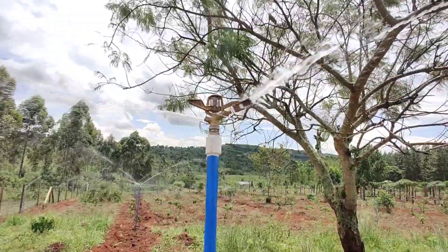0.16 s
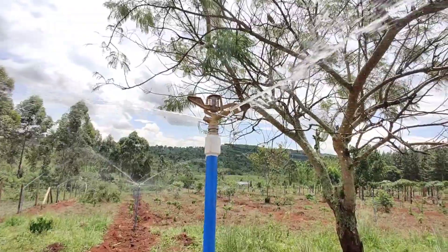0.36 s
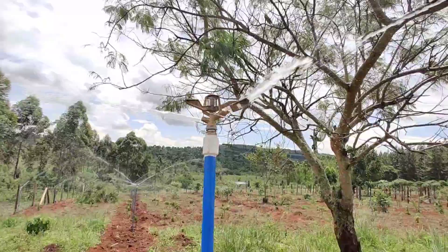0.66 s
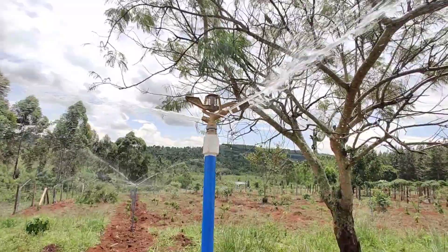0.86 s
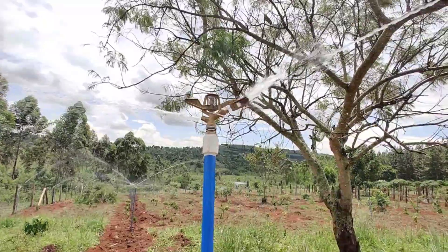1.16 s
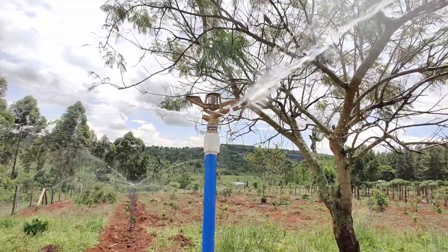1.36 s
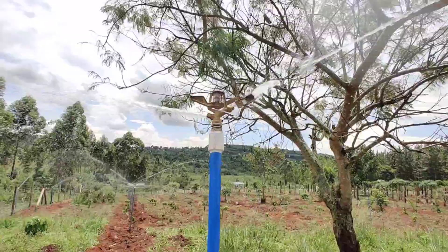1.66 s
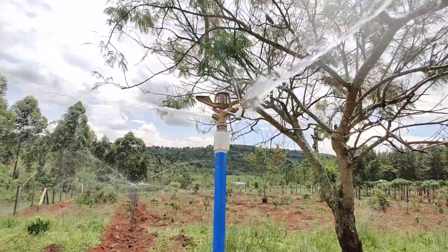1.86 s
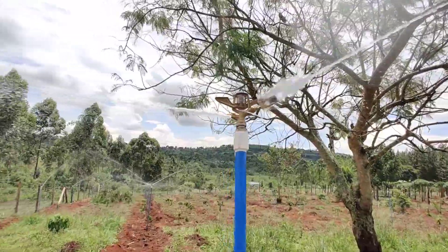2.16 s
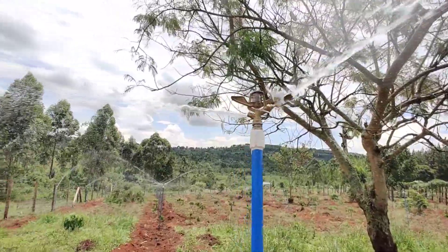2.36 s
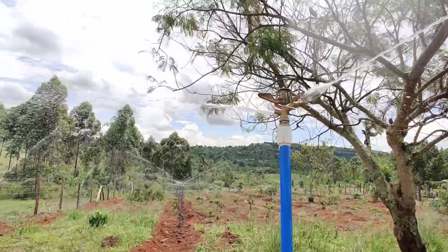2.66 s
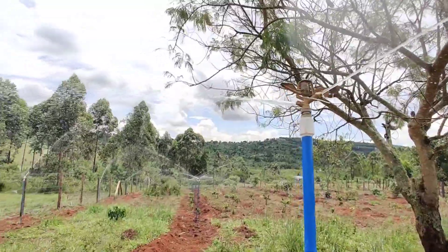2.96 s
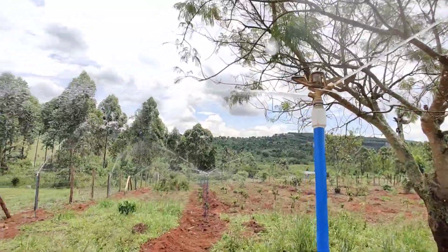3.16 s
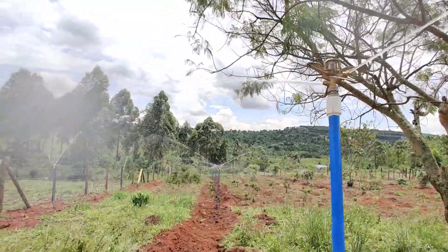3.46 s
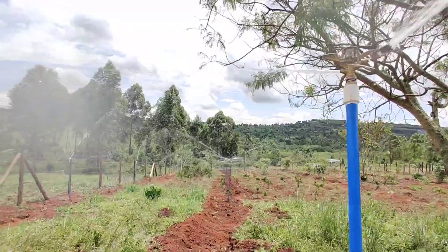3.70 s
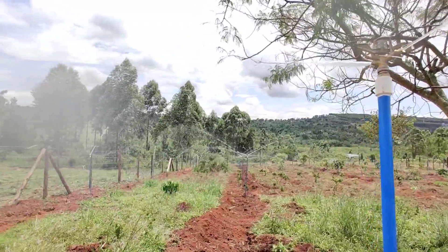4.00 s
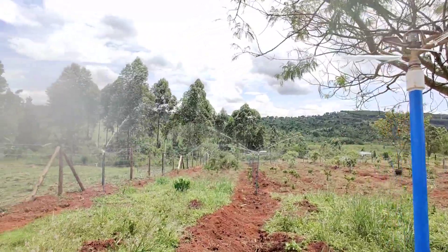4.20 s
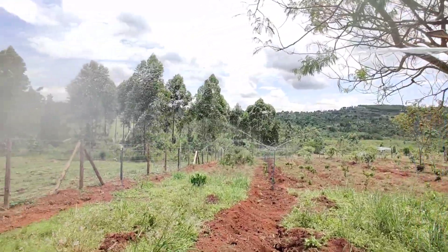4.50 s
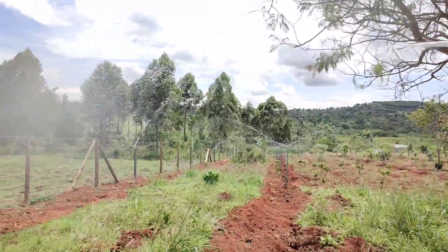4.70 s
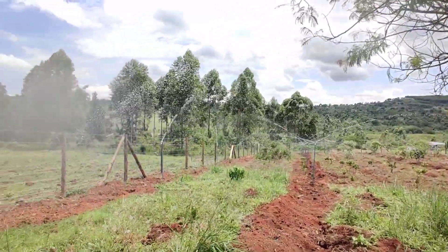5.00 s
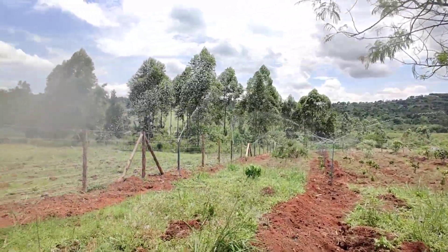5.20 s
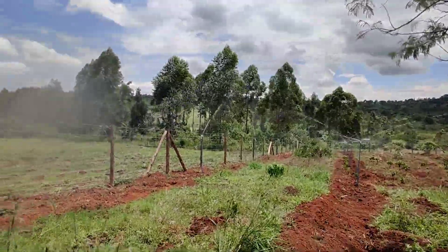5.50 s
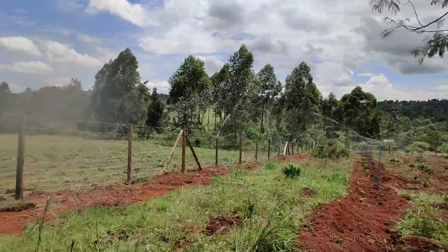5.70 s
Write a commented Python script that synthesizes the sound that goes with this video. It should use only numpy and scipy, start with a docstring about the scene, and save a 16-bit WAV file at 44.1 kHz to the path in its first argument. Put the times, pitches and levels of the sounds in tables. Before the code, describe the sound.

An impact sprinkler runs without pause for nearly six seconds in an open field, heard close in wide stereo. About six times a second the arm hits the jet: a quick double slap of coarse, crackling drops, a short fluttering sheet of spray, a dull little plop and a narrow high sizzle on the left, then a thinner bright swish before the next stroke. Fine nozzle hiss continues underneath with a faint rush of open air. From 0 to 0.7 s wind rumbles and pops on the microphone; weaker gusts come around 1 s, 1.4 to 2.5 s, 4.1 s and 4.9 s. Small drops click near the recorder, clearly at 0.26, 0.7, 1.8, 2.9 and 4.8 s. The swishes strengthen until about 4.7 s, as the sprinkler drifts rightward. Heavy drops knock wetly on the case at 5.05, 5.14, 5.2, 5.4 and 5.75 s.

```python
"""Impact sprinkler in an open field

Six times a second the sprinkler's arm slaps into the jet and sprays, then swings clear with a thinner swish.
The water is made of random drops and hiss, shaped in time and colour, over the steady hiss of the nozzle.
Stray drops tick and knock on the recorder as clicks and fading rings; wind is filtered noise in swells.
The left and right channels ring at different pitches.
"""
import sys
import numpy as np
from scipy import signal
from scipy.fft import rfft, irfft
from scipy.io import wavfile
from scipy.ndimage import uniform_filter1d, map_coordinates

SR = 44100
rng = np.random.default_rng(int(sys.argv[2]) if len(sys.argv) > 2 else 0)


def transcribe(signal):
    """Save signal, clipped to [-1, 1], as a 16-bit WAV file at the path in sys.argv[1]."""
    frames = np.atleast_2d(signal).T
    limited = np.clip(frames, -1, 1)
    pcm = np.round(limited * 32767).astype(np.int16)
    wavfile.write(sys.argv[1], SR, pcm)


N = 257984
TIME = np.arange(N) / SR

# the sprinkler drifts to the right:
# [t/s, lag of the left channel/ms, f of the right channel's dip/Hz, right-side treble level/dB]
BEARING = [(0, 0.21, 2090, -1), (2, 0.22, 2430, 1), (2.7, 0.247, 2760, 5), (3.5, 0.323, 2930, 6),
           (4.3, 0.339, 3880, 8), (5, 0.419, 4720, 5), (5.85, 0.441, 4580, 5)]


def from_db(db):
    """Turn decibels into a plain factor."""
    return 10 ** (np.asarray(db) / 20)


def rms_one(x):
    """Bring a sound to an average (RMS) strength of 1."""
    return x / np.sqrt(np.mean(x ** 2) + 1e-20)


def bell(x, centre, width):
    """A rounded peak of height 1."""
    return np.exp(-0.5 * np.minimum(((x - centre) / width) ** 2, 100))


def along(t, rows, axis=1):
    """One column of a table, joined by straight lines in time."""
    rows = np.array(rows)
    return np.interp(t, rows[:, 0], rows[:, axis])


def at_hz(points, hz):
    """A spectrum joined by straight lines in log frequency."""
    points = np.array(points)
    return np.interp(np.log(hz + 1), np.log(points[:, 0]), points[:, 1])


def drift(rate_hz, size):
    """A smoothly wandering random curve of spread 1."""
    knots = rng.standard_normal(size // 8 + 2)
    place = np.arange(size) * min(rate_hz / SR, 1 / 8)
    # straight lines between knots lose a third of the power; the root restores it
    return np.interp(place, np.arange(len(knots)), knots) * np.sqrt(3 / 2)


def colour(x, response, size=4096):
    """Filter that never acts ahead of the sound (minimum phase); response gives dB for Hz."""
    hz = np.arange(size // 2 + 1) * SR / size
    cepstrum = irfft(np.log(from_db(response(hz))))
    # folding the second half onto the first puts the filter's energy as early as possible
    cepstrum[1:size // 2] *= 2
    cepstrum[size // 2 + 1:] = 0
    impulse = irfft(np.exp(rfft(cepstrum)))
    return signal.oaconvolve(x, impulse)[:len(x)]


def tinted(pair, points):
    """Both channels through one spectrum."""
    return np.array([colour(x, lambda hz: at_hz(points, hz)) for x in pair])


def add(out, sound, s):
    """Mix a sound in at time s."""
    start = max(round(s * SR), 0)
    out[:, start:start + sound.shape[1]] += sound[:, :N - start]


def channel_rings(pair, left_db, right_db, right_hz):
    """Each channel has its own colour and one broad ring; the right one has a narrow dip near 8.7 kHz."""
    # channel colours without their rings: [f/Hz, level/dB]
    left_colour = [(150, -21), (900, -14.5), (1600, -4.5), (2400, -12.5), (3300, -9), (4200, -4.5),
                   (5200, -18.5), (6300, 1.3), (7300, 1), (10500, 4.5), (11500, 1), (13000, -1),
                   (15500, -4.5)]
    right_colour = [(150, -5.5), (900, -11.5), (1600, -2.5), (2400, -5.5), (3300, 2), (4200, 7),
                    (6500, -0.24), (7400, -11.5), (8500, 1), (10000, -14), (13000, -10.5), (15400, -5)]
    left_hz, left_width_hz, right_width_hz = 8740, 747, 526
    notch_hz, notch_db, notch_width_hz = 8740, -18.5, 420

    def left_response(hz):
        return at_hz(left_colour, hz) + left_db * bell(hz, left_hz, left_width_hz)

    def right_response(hz):
        ring = right_db * bell(hz, right_hz, right_width_hz)
        notch = notch_db * bell(hz, notch_hz, notch_width_hz)
        return at_hz(right_colour, hz) + ring + notch

    return np.array([colour(pair[0], left_response), colour(pair[1], right_response)])


def facing(pair, s):
    """Sound bends round the case to the right port: a dip and the treble shift as the sprinkler moves aside."""
    dip_hz, treble_db = along(s, BEARING, axis=2), along(s, BEARING, axis=3)

    def right_response(hz):
        dip = -10.0 * bell(hz, dip_hz, 0.098 * dip_hz)
        return dip + treble_db * bell(hz, 11500, 1800)

    return np.array([pair[0], colour(pair[1], right_response, size=1024)])


def rippled(pair, ripple_db=2.0, step_hz=330):
    """Every sheet of water breaks up with a random colour of its own."""
    grid = np.arange(0, SR, step_hz)
    ripples = ripple_db * rng.standard_normal((2, len(grid)))
    return np.array([colour(x, lambda hz: np.interp(hz, grid, r), size=1024) for x, r in zip(pair, ripples)])


def spray(per_s, spread_db, grainy, alike):
    """Water tearing into droplets: tiny clicks of uneven size over smooth hiss, partly common to both channels."""
    size_db = spread_db * np.minimum(rng.exponential(1, (3, N)), 4)
    sizes = from_db(size_db) * rng.choice([-1, 1], (3, N))
    drops = rms_one(sizes * (rng.random((3, N)) < per_s / SR))
    # grainy and alike are shares of the power
    water = np.sqrt(grainy) * drops + np.sqrt(1 - grainy) * rng.standard_normal((3, N))
    # the common part reaches the left channel later
    late = map_coordinates(water[0], [np.arange(N) - along(TIME, BEARING) * SR / 1000], order=3)
    common = np.array([late, water[0]])
    return np.sqrt(alike) * common + np.sqrt(1 - alike) * water[1:]


def arm_strokes(count=35):
    """The arm swings on its spring, each swing a little longer; rows hold time and the columns of aspect."""
    # the splash as the head turns and moves past the recorder: [t/s, relative splash level/dB,
    # left ring level/dB, right ring level/dB, right ring f/Hz]
    aspect = [(.08, -26, 13, 12, 5600), (.75, -24.5, 15.5, 11, 5650), (1.4, -24.5, 16, 11.8, 5610),
              (1.76, -25, 16.5, 15, 5920), (2.15, -27, 18.5, 10, 5570), (2.48, -28.5, 18.5, 13, 4870),
              (2.95, -28, 16, 17.5, 5010), (4.0, -27.5, 14, 19, 5340), (4.6, -28, 13.5, 19, 5340),
              (4.9, -28, 14, 12.5, 5460), (5.55, -27.5, 11, 19, 4650)]
    first_s, swing_s, growth_s = 0.0825, 0.16778, 0.000017
    k = np.arange(count)
    s = first_s + swing_s * k + growth_s * k * (k - 1) / 2
    trend = np.transpose([along(s, aspect, axis) for axis in range(1, 5)])
    # chance from stroke to stroke: dB, dB, dB, Hz
    chance = rng.standard_normal(trend.shape) * [0.5, 0.1, 0.1, 30]
    return np.column_stack([s, trend + chance])


def field(level_db=-56.5):
    """Soft rush of the open country: steady coloured noise."""
    # distant air: [f/Hz, relative level/dB]
    distant_air = [(30, -1), (120, -6), (250, 1), (400, -4.5), (700, -3.5), (1200, -25), (3000, -5),
                   (12000, -37)]
    return from_db(level_db) * rms_one(tinted(rng.standard_normal((2, N)), distant_air))


def wind(strokes, waver_db=3.5, waver_per_s=24, even_size=2600):
    """Turbulence hits each port separately; stronger wind brings out a higher, lumpier flap."""
    # the breeze on the ports dies down unevenly: [t/s, relative level/dB]
    breeze_levels = [(0, -25), (.45, -20), (.78, -35.5), (1.55, -35.5), (2.1, -28), (2.55, -32.5),
                     (3.05, -38), (3.45, -51.5), (4.499, -49.5), (4.8, -37), (5.1, -59), (5.85, -52)]
    # gusts on top of it: [t/s, width/s, relative level/dB]
    gust_list = [(0.013, 0.028, -14.5), (0.192, 0.019, -16), (.29, 0.032, -19), (.41, .04, -18.5),
                 (.61, 0.021, -20.5), (0.932, 0.069, -27.5), (1.03, 0.043, -29.5), (1.44, 0.026, -25.5),
                 (1.697, 0.031, -21), (1.88, .018, -23.5), (2.14, 0.025, -24), (2.29, 0.028, -27.5),
                 (2.42, 0.032, -25), (3.997, 0.011, -31), (4.081, 0.014, -29), (4.189, 0.011, -31.5),
                 (4.62, 0.0052, -38), (4.89, 0.015, -32), (4.985, 0.0082, -36)]
    # colours of the rumble, the buffeting and the flap of hard gusts: [f/Hz, relative level/dB]
    rumble = [(2, -28.5), (12, -6.5), (25, 0.5), (60, -2), (85, -4), (110, -11), (150, -28), (400, -67),
              (2000, -93)]
    buffet = [(50, -19.5), (100, -1.5), (130, 1), (200, -7), (300, -19), (450, -35), (1000, -60.5),
              (6000, -104)]
    flap = [(100, -15), (220, 2), (320, -2), (450, -9), (700, -21.5), (1500, -39.5), (6000, -57)]

    breeze = from_db(along(TIME, breeze_levels) + waver_db * drift(waver_per_s, N))
    gusts = [from_db(gust_db) * bell(TIME, s, width_s) for s, width_s, gust_db in gust_list]
    # every stroke pushes a puff of air at the ports
    puff_delay_s, puff_width_s, puff_db = 0.022, 0.015, -45
    puffs = [from_db(puff_db) * bell(TIME, s + puff_delay_s, puff_width_s) for s, *_ in strokes]
    wind_db = 10 * np.log10(breeze ** 2 + sum(gust ** 2 for gust in gusts + puffs))

    # level in a wind of 0 dB, plus dB for each dB of wind
    rumble_db = -8 + 0.5 * wind_db
    flap_db = -2.5 + 1.563 * wind_db
    out = 0
    # the last number is the unevenness of the lumps in dB
    for spectrum, level_db, lumps_db in ((rumble, rumble_db, 2.0), (buffet, wind_db, 3.5), (flap, flap_db, 4.5)):
        lumps = from_db(lumps_db * np.array([drift(70, N), drift(70, N)]))
        air = tinted(rng.standard_normal((2, N)) * lumps, spectrum)
        # evened out, so that breeze, gusts and puffs alone set the slow swell
        power = uniform_filter1d(np.mean(air ** 2, axis=0), even_size)
        out = out + from_db(level_db) * air / np.sqrt(power + 1e-12)
    return out


def eddies(level_db=-0.5, lean_db=4.5):
    """An eddy crossing the ports is a rounded pressure pulse with a trough each side, stronger at one port."""
    # single hard eddies that pop: [t/s, relative level/dB, width/s]
    pops = [(.031, -17.5, 0.00028), (.198, -12.5, 0.00098), (.284, -14.5, 0.0004), (.31, -13, 0.00057),
            (.352, -11.5, 0.00082), (0.411, -18, 0.00072), (.421, -12.5, 0.00056), (.449, -14, 0.00065),
            (1.68, -12.5, 0.00186), (1.691, -16, 0.0016), (2.429, -18, 0.0008), (4.07, -17, 0.0016),
            (4.085, -18, 0.0016)]
    out, t = np.zeros((2, N)), np.arange(-500, 500) / SR
    for s, peak_db, width_s in pops:
        u = (t / width_s) ** 2
        lean = lean_db * np.tanh(rng.standard_normal()) * np.array([[1], [-1]])
        pulse = (1 - u / 2) * np.exp(-u / 2)
        add(out, from_db(level_db + peak_db + lean) * pulse, s + t[0])
    return out


def knocks(fade_s=0.0073, splat_db=-11.5, rise_s=0.00079, lag_s=0.00042, size=8192):
    """A heavy drop rings the case and splatters over it; the ring reaches the left channel a little later."""
    # heavy drops on the case: [t/s, relative ring level/dB, relative splat level/dB]
    heavy_drops = [(5.053, -29.5, -14.5), (5.137, -33, -20), (5.195, -25.5, -7.5), (5.415, -23.5, -11),
                   (5.752, -26.5, -23)]
    # ringing tones of the case: [f/Hz, relative level/dB, time to fade by 60 dB/s]
    case_tones = [(239, -11.5, .1), (330, -9, 0.045), (517, -10, 0.046), (688, -5.5, 0.05), (737, 1, 0.076),
                  (787, -3.5, 0.025), (1320, -8, 0.042), (1820, -13, 0.022), (2780, -21, 0.034)]
    # colour of the splat: [f/Hz, relative level/dB]
    splat_colour = [(150, -12), (600, -2), (1100, -8), (1800, 4), (2900, -2), (4200, -8), (9000, -29),
                    (15000, -32)]
    rings, splats, t = np.zeros((2, N)), np.zeros((2, N)), np.arange(size) / SR
    age = np.maximum(t - np.array([[lag_s], [0]]), 0)
    ring = np.zeros((2, size))
    for hz, db, t60 in case_tones:
        phase = rng.uniform(0, 2 * np.pi)
        ring += from_db(db - 60 * age / t60) * np.sin(2 * np.pi * hz * age + phase)
    ring *= 1 - np.exp(-age / rise_s)
    for s, ring_db, wet_db in heavy_drops:
        add(rings, from_db(ring_db) * ring, s)
        splat = rng.standard_normal((2, size)) * np.exp(-t / fade_s)
        add(splats, from_db(wet_db + splat_db) * splat, s)
    # the splat is louder on the right
    return rings + tinted(splats, splat_colour) * from_db([[-3.0], [4.0]])


def ticks(fade_s=0.0013, wet=0.1, size=2048):
    """A small drop lands as a click with a very short splat."""
    # the clearest small drops: [t/s, relative left level/dB, relative right level/dB]
    clear_drops = [(0.039, -37, -12), (.051, -35, -8.5), (0.2557, -2, -5.5), (.393, -25, -13),
                   (.542, -33, -13), (.55, -35, -8.5), (0.673, -25, -14), (0.7009, -19, 1), (.873, -23, -9),
                   (1.7888, -6.5, -7), (2.918, -27, -8), (2.93, -18, -7), (2.933, -23, -13),
                   (3.088, -21, -15), (4.765, -9.5, -16), (4.789, -17, -10.5), (5.292, -7.5, -12),
                   (5.345, -31, -12), (5.633, -26, -8)]
    # colour of a tick: [f/Hz, relative level/dB]
    tick_colour = [(300, 3.5), (700, 12), (1500, 1.5), (2300, 5), (4000, 4.5), (5500, 5.5), (9000, 2.5),
                   (15000, -8)]
    # fainter ones fall at random
    faint_per_s, faint_left_db, faint_right_db, faint_spread_db = 2.2, -30, -20, 4
    faint_times = TIME[rng.random(N) < faint_per_s / SR]
    faint = [(s, *rng.normal([faint_left_db, faint_right_db], faint_spread_db)) for s in faint_times]
    out, t = np.zeros((2, N)), np.arange(size) / SR
    for s, left_db, right_db in clear_drops + faint:
        click = (t == 0) + wet * rng.standard_normal(size) * np.exp(-t / fade_s)
        add(out, click * from_db([[left_db], [right_db]]), s)
    return channel_rings(tinted(out, tick_colour), left_db=21.0, right_db=8.0, right_hz=5260)


def jet(level_db=-41, flutter_db=1.52):
    """The nozzle hisses all the time, fluttering slightly; its level is set ahead of the colouring."""
    # colour of the jet: [f/Hz, relative level/dB]
    jet_colour = [(300, 5), (900, 9.5), (1600, 3.5), (2300, 4.5), (3300, 0.5), (4600, -1), (7000, 0),
                  (10000, 4.5), (15500, 3.5)]
    level = from_db(level_db + flutter_db * drift(90, N))
    water = spray(per_s=1200, spread_db=1.5, grainy=0.35, alike=0.25) * level
    return channel_rings(tinted(water, jet_colour), left_db=11.0, right_db=12.5, right_hz=5430)


def swishes(strokes, width_s=0.012, flutter_db=1.0):
    """At the far end of its swing the arm lets the jet tear into a thin, bright fan."""
    # the swish comes earlier and mostly grows as the head turns:
    # [t/s, delay after the stroke/s, relative level/dB]
    fan = [(0, 0.14, -28.5), (1.4, .127, -30), (2.1, .118, -28.5), (3.2, .119, -26), (3.9, .111, -24),
           (4.7, .11, -22.5), (5.85, 0.1, -26.5)]
    # colour of the swish: [f/Hz, relative level/dB]
    swish_colour = [(500, -24), (2300, -11.5), (3500, -12.5), (5200, -13.5), (7200, -2.5), (8700, -3.5),
                    (10500, -3), (15500, -1)]
    swell = np.zeros(N)
    for s, *_ in strokes:
        swell += from_db(along(s, fan, axis=2)) * bell(TIME, s + along(s, fan), width_s)
    flutter = from_db(flutter_db * drift(250, N))
    water = spray(per_s=3200, spread_db=4.0, grainy=0.11, alike=0.36) * swell * flutter
    swish = tinted(water, swish_colour) * from_db([[-0.5], [-6.0]])
    return channel_rings(swish, left_db=11.5, right_db=18.5, right_hz=5220)


def spits(strokes, delay_s=0.058, rise_s=0.0035, level_db=-2.0, uneven_db=1.0, pitch_hz=8950, width_hz=520):
    """A short, narrow sizzle follows each splash as the jet closes again, mostly in the left channel."""
    swell = np.zeros(N)
    for s, splash_db, *_ in strokes:
        age = np.clip((TIME - s - delay_s) / rise_s, 0, 30)
        strength = from_db(splash_db + level_db + uneven_db * rng.standard_normal())
        swell += strength * age * np.exp(1 - age)
    sizzle = colour(rng.standard_normal(N), lambda hz: 30 * bell(hz, pitch_hz, width_hz))
    return rms_one(sizzle) * swell * from_db([[0], [-28.0]])


def plops(strokes, delay_s=0.0439, width_s=0.0037, level_db=-3.5, uneven_db=2.0):
    """The last water leaves the arm with a dull plop."""
    # colour of the plop: [f/Hz, relative level/dB]
    plop_colour = [(200, -24), (600, 0), (1000, -0.5), (1500, -1.5), (2000, 3), (2800, -25), (6000, -20),
                   (15000, -38)]
    swell = np.zeros(N)
    for s, splash_db, *_ in strokes:
        strength = from_db(splash_db + level_db + uneven_db * rng.standard_normal())
        swell += strength * bell(TIME, s + delay_s, width_s)
    water = spray(per_s=1400, spread_db=5.5, grainy=0.44, alike=0.72)
    return tinted(water * swell, plop_colour)


def slaps(strokes, scatter=0.1, uneven_db=0.5, left_extra_db=0.5, right_extra_db=3.0, size=1536):
    """Each slap is a sudden crackle of coarse drops with strong channel rings, a little irregular in time."""
    # the arm slaps the water as it enters the jet and again as it rebounds:
    # [t after the stroke/s before scatter, relative level/dB, fade time/s]
    slap_pair = [(.003, -4.5, 0.0091), (.026, -1, 0.009)]
    # colour of a slap: [f/Hz, relative level/dB]
    slap_colour = [(500, -21), (2000, -12), (4000, -7.5), (6000, 7), (9000, 0), (12000, -4), (15500, 9)]
    water = tinted(spray(per_s=2600, spread_db=2.5, grainy=1.0, alike=0.22), slap_colour)
    out, t = np.zeros((2, N)), np.arange(size) / SR
    for s, level_db, left_db, right_db, right_hz in strokes:
        for delay_s, slap_db, fade_s in slap_pair:
            start = rng.integers(N - size)
            strength = from_db(level_db + slap_db + uneven_db * rng.standard_normal((2, 1)))
            burst = water[:, start:start + size] * np.exp(-(t / fade_s) ** 2) * strength
            burst = facing(rippled(burst), s)
            heard = channel_rings(burst, left_db + left_extra_db, right_db + right_extra_db, right_hz)
            add(out, heard, s + delay_s * (1 + scatter * rng.uniform(-0.9, 1)))
    return out


def splashes(strokes, sheet_db=-0.92, flutter_db=1.4, left_ease_db=0.5, right_ease_db=4.0, size=5120):
    """The arm chops the jet; the sheet of water flutters as it breaks up, with gentler channel rings."""
    # the sheet of spray thrown off while the arm is in the jet: [t after the stroke/s, relative level/dB]
    splash_shape = [(-.012, -11), (-.003, -14.5), (.001, 1), (.007, 0.5), (.018, -0.5), (.031, 1),
                    (.039, 0), (.046, -3.5), (.053, -14), (.075, -24)]
    water = spray(per_s=3000, spread_db=-2.5, grainy=0.55, alike=0.76) * from_db(flutter_db * drift(350, N))
    water = np.pad(water, ((0, 0), (0, size)))
    out, t = np.zeros((2, N)), np.arange(size) / SR + splash_shape[0][0]
    shape = from_db(along(t, splash_shape)) * (t < splash_shape[-1][0])
    for s, level_db, left_db, right_db, right_hz in strokes:
        start = round((s + t[0]) * SR)
        burst = water[:, start:start + size] * shape * from_db(level_db + sheet_db)
        burst = facing(rippled(burst), s)
        heard = channel_rings(burst, left_db - left_ease_db, right_db - right_ease_db, right_hz)
        add(out, heard, s + t[0])
    return out


def scene():
    """Weather, stray drops and the sprinkler together."""
    strokes = arm_strokes()
    surroundings = field() + wind(strokes) + eddies() + knocks() + ticks()
    sprinkler = jet() + swishes(strokes) + spits(strokes) + plops(strokes) + slaps(strokes) + splashes(strokes)
    # the water sounds dip briefly by 4 dB around 0.42 s
    dip = from_db(-4 * bell(TIME, 0.42, 0.1))
    return surroundings + sprinkler * dip


def record(dry):
    """The treble above 15.9 kHz is cut steeply."""
    return signal.sosfilt(signal.ellip(12, 0.1, 80, 15900, fs=SR, output="sos"), dry)


dry = scene()
out = record(dry)
transcribe(out)
```